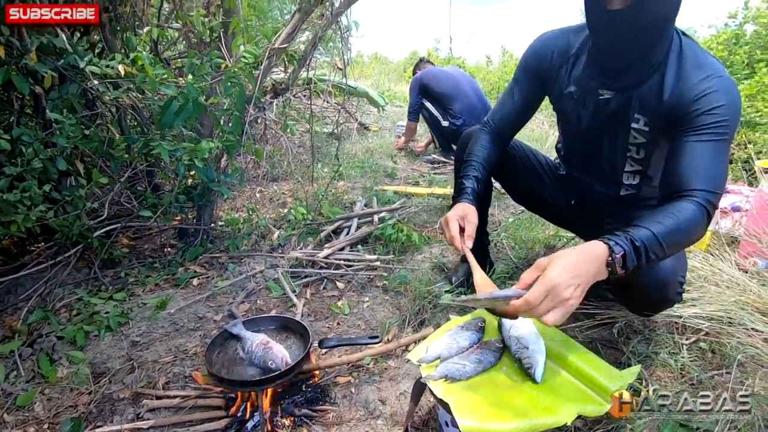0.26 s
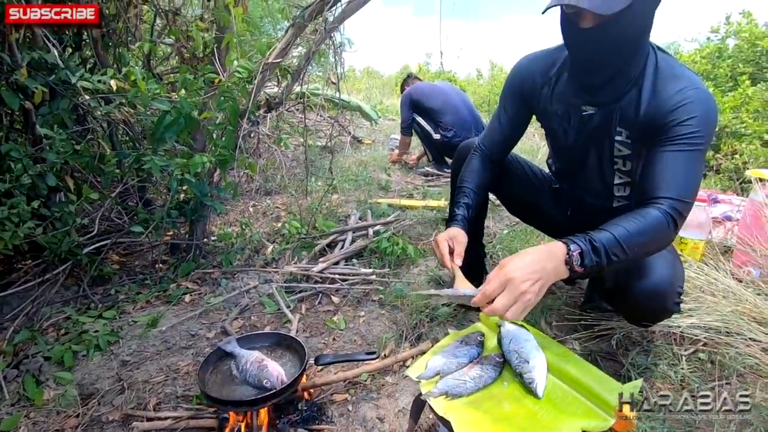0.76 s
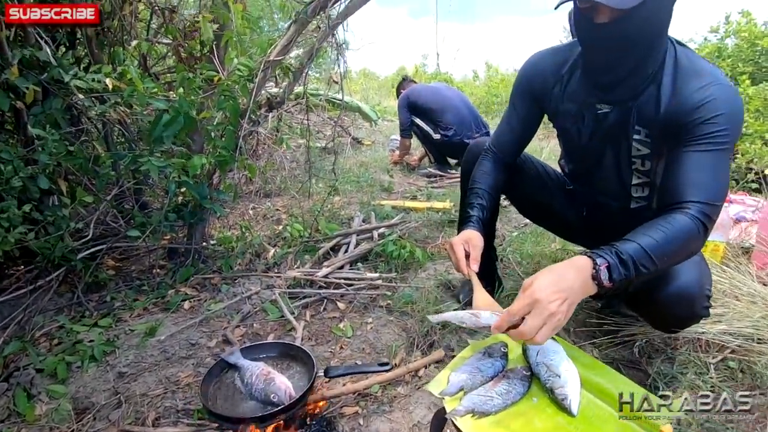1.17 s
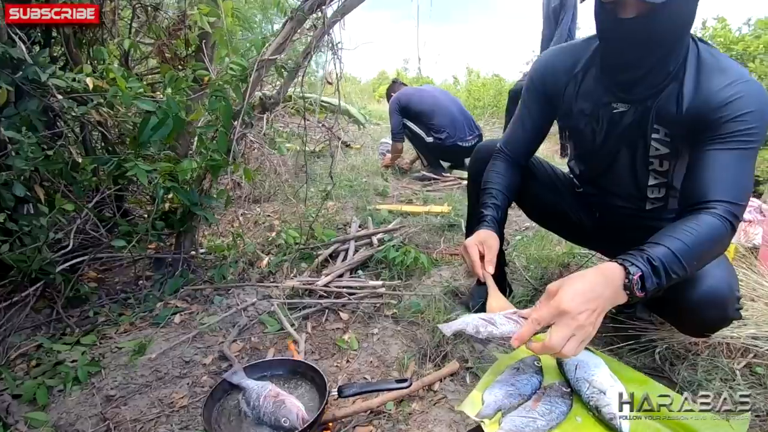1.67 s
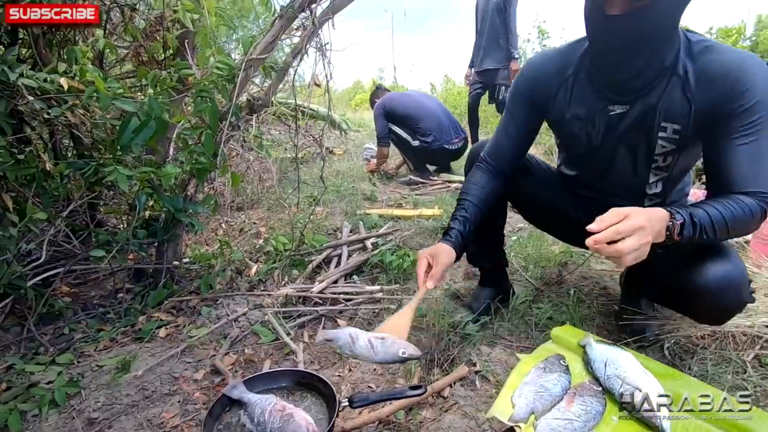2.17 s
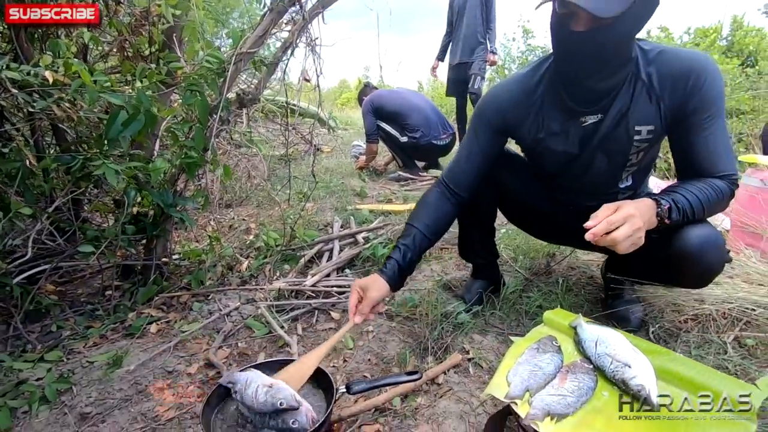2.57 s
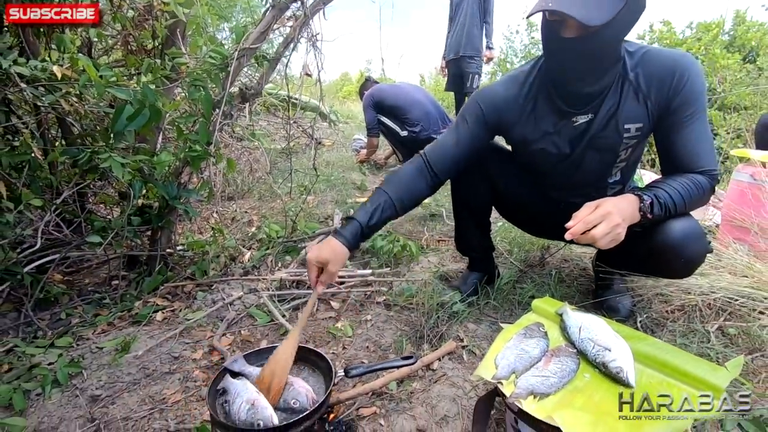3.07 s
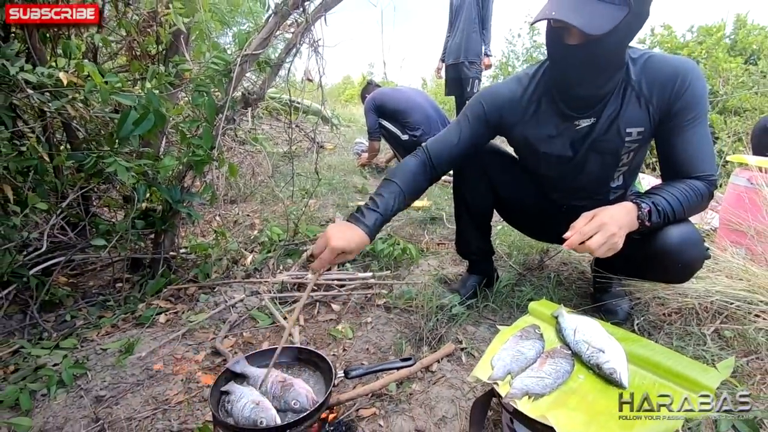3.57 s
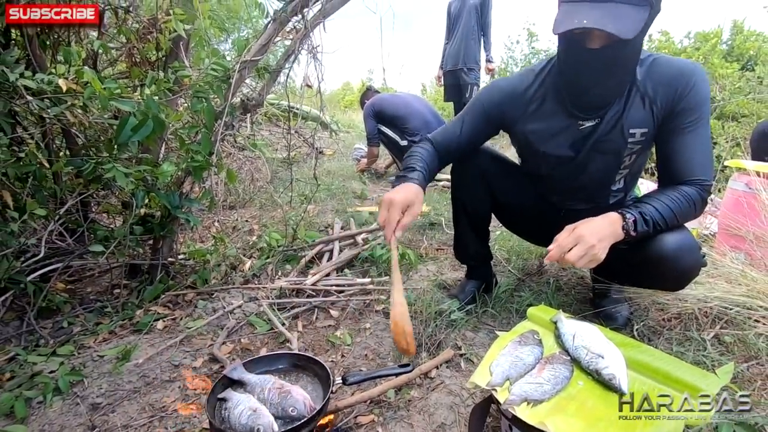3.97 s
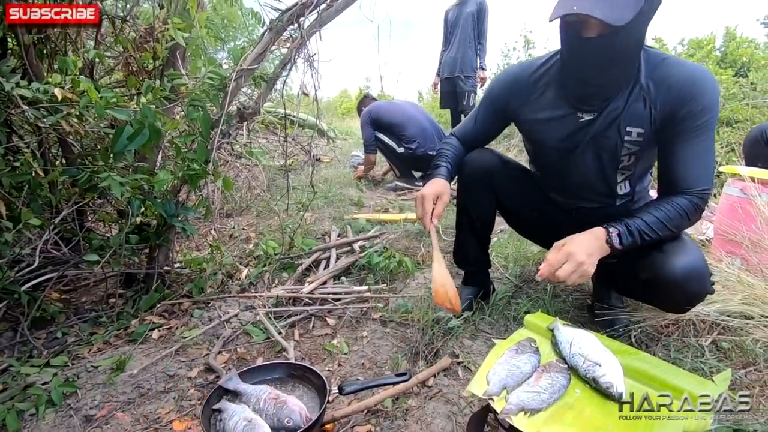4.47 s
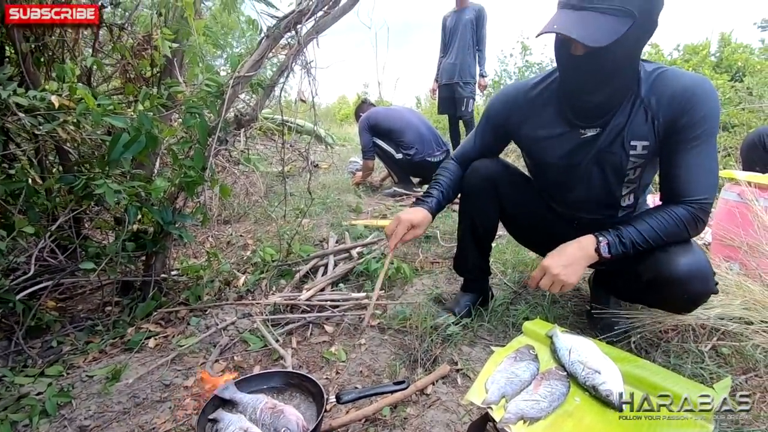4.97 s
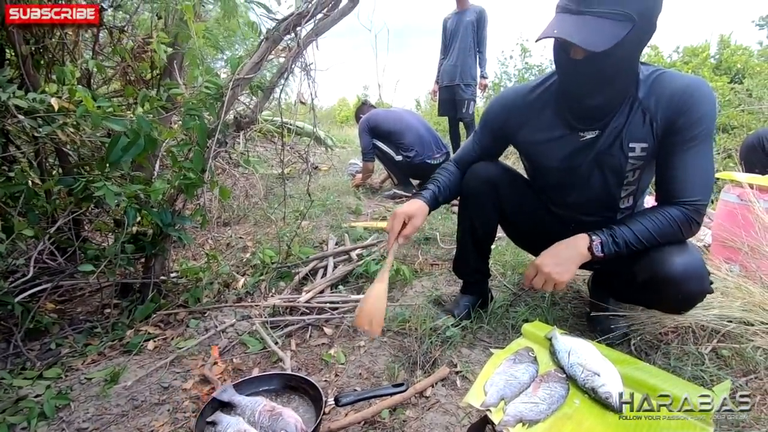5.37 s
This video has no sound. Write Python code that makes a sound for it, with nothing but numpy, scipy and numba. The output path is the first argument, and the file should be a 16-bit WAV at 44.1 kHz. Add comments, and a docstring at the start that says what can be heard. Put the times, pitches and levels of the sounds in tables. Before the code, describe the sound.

Close, outdoor stereo sound from a hand-held camera roughly a metre above a frying pan. A dense, bright sizzle of hot oil runs throughout, with tiny ticks, crackles and loud pops, clustered in the first 0.9 seconds. It dips briefly from about 1.47 to 1.59, returning abruptly with a sharp high spit, and a strong pop follows at 1.72. From about 2.5 to 3.5, as another fish enters the pan, the crackle sinks in pitch; pops crowd thickly around 4.0 to 4.6 and a very loud one snaps at 5.49. Further off, slightly right, dull wood chops fall near 1.25, 2.04, 2.77, 3.55 (clearest and woodiest) and 4.26, with light touches before some. A faint wavering engine drone and soft fire roar sit beneath, the roar fullest around 2.5. Low wind flutters early, calms mid-way, then buffets more strongly from 4.5 to the end.

```python
"""Fish frying over a wood fire

Outdoors, a pan of hot oil about a metre below a hand-held camera with two microphone ports.
Steam bubbles ring by the thousand; the ground echoes them, and the comb slides as the camera moves.
Wind flutters on the ports as coloured noise; an engine drones in narrow noise bands under a soft roar.
Further off somebody chops wood: each blow sets decaying modes ringing, with a crack and splinters."""
import sys
import numpy as np
from scipy import signal
from scipy.fft import rfft, irfft
from scipy.io import wavfile
from scipy.ndimage import uniform_filter1d, map_coordinates
from numba import njit

SR = 44100
rng = np.random.default_rng(int(sys.argv[2]) if len(sys.argv) > 2 else 0)


def put_to_file(sound):
    """Save the sound as 16-bit audio at rate SR, in the file named by the first command-line argument."""
    columns = np.atleast_2d(sound).T  # one column per channel
    safe = np.clip(columns, -1, 1)
    whole_steps = np.round(safe * 32767)
    wavfile.write(sys.argv[1], SR, whole_steps.astype(np.int16))


N = 247401

# How the fry boils; only the changes count, not the overall heights.
# Each row: time in seconds, large bubbles in dB, middling bubbles in dB, fine spray in dB.
BOIL_COURSE = [(0, -38.5, -22.5, -36), (.5, -37, -20.5, -36.5), (.98, -38, -25.5, -39),
               (1.26, -40, -21.5, -36.5), (1.44, -39.5, -23.5, -38), (1.6, -36.5, -21.5, -33.5),
               (1.69, -35, -19, -38), (1.82, -37, -20.5, -32.5), (1.96, -34.5, -22.5, -37.5),
               (2.5, -36, -20.5, -35.5), (2.8, -36.5, -22, -33.5), (2.95, -33.5, -20.5, -36),
               (3.1, -35, -22, -36), (3.36, -36, -20.5, -37), (3.75, -36, -23, -37.5),
               (3.95, -35.5, -20, -37), (4.5, -35, -22, -38.5), (5.0, -32, -21, -37),
               (5.61, -35, -20.5, -37.5)]


def undb(db):
    """Decibels to gain."""
    return 10 ** (np.asarray(db) / 20)


def level(x, db):
    """Scale to an rms level in dB."""
    return x * undb(db) / np.sqrt(np.mean(x ** 2))


def curves(table):
    """Columns of a curve table, joined by straight lines, one value a sample."""
    s, *columns = np.transpose(table)
    return [np.interp(np.arange(N) / SR, s, c) for c in columns]


def colour(x, points):
    """Filter by (Hz, dB) points, joined on a logarithmic frequency scale."""
    hz, db = np.transpose(points)
    f = np.arange(N // 2 + 1) * SR / N + 1  # one Hz up, to keep the logarithm finite
    gain = undb(np.interp(np.log(f), np.log(hz), db, left=-120))
    return irfft(rfft(x) * gain, N)


def band(lo_hz, hi_hz):
    """Noise between two edges, rms 1."""
    sos = signal.butter(3, [lo_hz, hi_hz], "bandpass", fs=SR, output="sos")
    return level(signal.sosfilt(sos, rng.standard_normal(N)), 0)


def walk(rate_hz):
    """Random steps drawn at a given rate and smoothed twice; standard deviation 1."""
    k = int(SR / rate_hz)
    steps = np.repeat(rng.standard_normal(N // k + 1), k)
    w = uniform_filter1d(uniform_filter1d(steps, k), k)[:N]
    return w / w.std()


def sides(pan_db):
    """Left and right gains from left minus right in dB."""
    return undb(np.array([pan_db, -pan_db]) / 2)


@njit
def bubbles(n, start, turn, ring_rad, size, tilt, glide):
    """Each bubble swells, rings with rising pitch and dies away; row 1 is the part unequal at the ports."""
    out = np.zeros((2, n))
    for k in range(len(start)):
        tau = ring_rad[k] / turn[k]  # decay time in samples
        z = size[k] * (np.e / 2 / tau) ** 2 + 0j  # brings the envelope's peak to size
        p = np.exp(1j * turn[k] - 1 / tau)
        bend = np.exp(1j * glide * turn[k] / tau)
        for i in range(min(int(9 * tau), n - start[k])):
            v = i * i * z.imag
            out[0, start[k] + i] += v
            out[1, start[k] + i] += tilt[k] * v
            z, p = z * p, p * bend
    return out


def burst(s, hz, ring_rad, size, tilt, glide=0.0056):
    """Bubbles at times s; the decay time spans ring_rad radians, in which pitch rises by the share glide."""
    start = (s * SR).astype(np.int64)
    return bubbles(N, start, 2 * np.pi * hz / SR, 1. * ring_rad, 1. * size, tilt, glide)


def singles(s, db, hz, ring_rad):
    """Loud bubbles one by one; each starts to swell two decay times before its peak."""
    ring_rad = np.clip(ring_rad, 1, 16) + 0 * s
    start = s - 2 * ring_rad / (2 * np.pi * hz)
    return burst(start, hz + 0 * s, ring_rad, undb(db), np.zeros(len(s)))[0]


def lull(start_s=1.466, fall_s=0.029, end_s=1.587, return_s=0.0041):
    """0 to 1 while the sizzle dips briefly and returns at once."""
    corners = [start_s, start_s + fall_s, end_s, end_s + return_s]
    return np.interp(np.arange(N) / SR, corners, [0, 1, 1, 0])


def boil(wander_db=1.0, flicker_db=0.74, lull_db=-4, lull_fine_db=-3.5):
    """Strength of large, middling and fine bubbles in dB: the slow course, a wander and the lull."""
    large, middling, fine = curves(BOIL_COURSE)
    middling = middling + wander_db * walk(7.) + lull_db * lull()
    fine = fine + flicker_db * walk(7.07) + lull_fine_db * lull()
    return large, middling, fine


def sizzle(count=130000, spread_db=1.5, top_db=2.5, ring_rad=7.0, spatter_db=0.97, together_db=0.52,
           lull_deepest_hz=5770, lull_deeper_db=-5):
    """A dense rain of bubbles, the smaller the more numerous; the boil comes in short spatters."""
    large_db, middling_db, fine_db = boil()
    when, pitch, luck, length, place = rng.random((count, 5)).T
    hz = 500 + 15500 * pitch
    at = (when * (N - 1)).astype(int)
    # shares of the three sizes, cross-faded by pitch
    large = np.clip(np.log(2400 / hz) / np.log(1.3), 0, 1)
    fine = np.clip(np.log(hz / 5800) / np.log(1.3), 0, 1)
    together = together_db * walk(9.)

    def swell(db):
        return (db - db.mean() + together + spatter_db * walk(45.))[at]

    boil_db = large * swell(large_db) + fine * swell(fine_db) + (1 - large - fine) * swell(middling_db)
    # bubbles near one pitch fall quietest in the lull
    nearness = np.exp(-(np.log(hz / lull_deepest_hz) / 0.23) ** 2)
    boil_db = boil_db + lull_deeper_db * lull()[at] * nearness
    size_db = np.minimum(-spread_db * np.log(luck + 1e-9), top_db) + boil_db
    # short high bubbles start stronger, so that the rain as a whole is white
    size = np.sqrt(hz) * undb(size_db)
    return burst(at / SR, hz, ring_rad * (.5 + 1.16 * length ** 2), size, 2 * place - 1)


def bright(x, hz=5140, width_hz=220):
    """A narrow resonance lifts one band of the sizzle, strongest at first, briefly again, then almost gone."""
    # Each row: time in seconds, share of the band added.
    bright_course = [(0, 1), (1.4, 1), (1.75, .2), (2.25, 0.63), (2.75, 0.083), (5.61, .01)]
    return x + curves(bright_course)[0] * signal.lfilter(*signal.iirpeak(hz, hz / width_hz, fs=SR), x)


def crackle(count=450, scatter=.15, spread_db=0.7, ring_rad=7.4):
    """Middling pops at random moments, of uneven size and ring, crowd round a favoured pitch."""
    # The pitch sinks as the second fish goes in.
    # Each row: time in seconds, middle pitch in Hz, base level in dB before each pop's own luck.
    crackle_course = [(0, 3600, -20), (1.0, 3800, -18), (2.5, 3780, -20), (3.5, 2520, -21),
                      (4.4, 2640, -17.5), (5.61, 2780, -19.5)]
    when, luck, length = rng.random((count, 3)).T
    hz, db = (c[(when * (N - 1)).astype(int)] for c in curves(crackle_course))
    s = .01 + when * (N / SR - .02)
    hz = hz * np.exp(scatter * rng.standard_normal(count))
    return singles(s, db - spread_db * np.log(luck + 0.12), hz, ring_rad * (.5 + length))


def ticks(count=900, hz=3200.0, scatter=0.33, tick_db=-23, spread_db=2.5, ring_rad=1.77):
    """Tiny droplets snap and die within a few cycles, so each tick covers a wide band."""
    when, luck = rng.random((count, 2)).T
    boil_db = boil()[1][(when * (N - 1)).astype(int)] - curves(BOIL_COURSE)[1].mean()
    db = tick_db + boil_db - spread_db * np.log(luck + 0.03)
    s = .01 + when * (N / SR - .02)
    return singles(s, db, hz * np.exp(scatter * rng.standard_normal(count)), ring_rad)


def pops():
    """Loud single bubbles, each with its own pitch and ring."""
    # Each row: peak time in seconds, peak of the direct sound in dB, pitch in Hz,
    # ring in radians per decay time.
    pop_rows = [(0.04, -10, 3890.0, 3.5), (0.0954, -10, 3640, 5.1), (0.1332, -10, 3600.0, 2.2),
                (0.1587, -5, 3600.0, 4.1), (0.2032, -3, 3070, 7.8), (0.254, -7, 3200.0, 3),
                (0.2738, -11, 3760, 3.1), (0.3752, -3, 3460.0, 3.8), (0.4057, -5, 4550.0, 2.6),
                (0.567, -6, 3540, 7.5), (0.591, -7, 4100.0, 10.5), (0.5944, -11.5, 3460.0, 4.1),
                (0.6753, -10.5, 4100, 10), (0.7008, -4, 3430, 2.2), (0.7185, -11, 3740.0, 2.6),
                (0.7642, -12, 4050.0, 10.5), (0.808, -8, 3540, 11), (0.8415, -7, 4000, 8),
                (0.8936, -5.5, 4940, 5.9), (1.0163, -15, 3600, 3), (1.1523, -10, 3940, 2.3),
                (1.455, -5, 4200, 3.3), (1.6834, -14, 3600.0, 8.0), (1.6917, -11, 3460.0, 6.0),
                (1.7162, 0.5, 4050.0, 1.8), (1.7425, -7, 5340, 4.5), (1.899, -8, 4800, 6.6),
                (2.126, -5, 3950, 4.5), (2.264, -9, 3700, 5.9), (2.277, -15, 3330.0, 2.3),
                (2.2903, -8, 3330.0, 3.8), (2.331, -9, 3740.0, 6.3), (2.3575, -9, 3620, 3.8),
                (2.3685, -8, 3890.0, 10.5), (2.4528, -5, 4380.0, 2.0), (2.4624, -6, 3330.0, 3.2),
                (2.4656, -15, 3890.0, 10.5), (2.4808, -10, 3460.0, 4.5), (2.554, -13.5, 4000, 13.0),
                (2.63, -10, 3460.0, 2.0), (2.6374, -8, 3330.0, 2.5), (2.6527, -10, 4050.0, 10.5),
                (2.6631, -13.5, 4050.0, 7.1), (2.7417, -9.5, 3300, 10.5), (2.762, -4.5, 3350, 2.6),
                (2.859, -4, 3460.0, 2.2), (2.966, -2, 3740.0, 2.4), (2.9748, -5.5, 2530.0, 3.0),
                (3.043, -9, 3740.0, 2.0), (3.0722, -12, 4210.0, 11), (3.09, -3.5, 4020, 5.5),
                (3.135, -9, 2630.0, 6.6), (3.19, -6, 2960.0, 3.0), (3.2818, -10, 3860, 5.2),
                (3.3121, -7, 3080.0, 3.0), (3.3175, -12.5, 2730.0, 2.7), (3.4148, -14, 3200.0, 3),
                (3.4708, -6.5, 3800, 13.0), (3.5603, -6, 2980, 3.8), (3.627, -11.5, 2670, 10.5),
                (3.8041, -5.5, 2730.0, 3.9), (3.843, -7, 2730.0, 2.6), (3.915, -8, 2960.0, 4.5),
                (3.9194, -9, 2840.0, 7), (3.9258, -9, 2840.0, 4.9), (3.9345, -6, 2250.0, 2.0),
                (3.9847, -6, 3200.0, 2.0), (3.9942, -6, 2580, 8.0), (4.013, -6, 4050.0, 2.0),
                (4.0191, -10, 2700, 8.0), (4.0393, -4, 3890.0, 2.4), (4.1247, -10.5, 2500, 13.0),
                (4.134, -7.5, 2630.0, 6.5), (4.1542, -10, 3600.0, 7.3), (4.22, -8, 2100.0, 2.8),
                (4.224, -18, 1620, 12), (4.252, -8.5, 2530.0, 4.9), (4.283, -11.5, 2840.0, 3.0),
                (4.2936, -5.5, 2420, 4.5), (4.3178, -8, 2630.0, 2.6), (4.3384, -11, 3460.0, 3.0),
                (4.342, -9.5, 3200.0, 1.8), (4.3605, -3.5, 2700, 7), (4.372, -9, 3100, 13.0),
                (4.385, -4, 2730.0, 2.8), (4.3915, -2.5, 2700, 5.7), (4.4114, -4, 2900, 6.0),
                (4.4309, -13, 2730.0, 8.3), (4.446, -6.5, 3080, 11), (4.4657, -8, 2840.0, 4.5),
                (4.4705, -7, 3200.0, 2.6), (4.474, -5, 3600.0, 2.8), (4.5363, -6.5, 2730.0, 5.7),
                (4.5403, -11, 2730.0, 6.4), (4.57, -5, 2490, 4.5), (4.5765, -3, 3200.0, 2.0),
                (4.582, -9, 3600.0, 3.0), (4.6205, -5, 2960.0, 4.3), (4.6265, -10, 3040, 9.1),
                (4.7771, -7.5, 2400, 7.5), (4.782, -9, 4050.0, 4), (4.823, -13, 3080.0, 4.9),
                (4.829, -9, 3460.0, 2.6), (4.854, -10.5, 3200.0, 2.3), (4.8613, -6, 5150, 6.5),
                (4.8625, -14, 6100, 7.5), (4.9173, -10, 2530.0, 3.2), (4.9226, -4.5, 2830, 8.5),
                (4.9576, -13, 2940, 6.0), (4.973, -11, 3100, 10), (4.98, -11, 3440, 10.5),
                (5.0271, -4, 3020, 6.9), (5.0294, -9, 1340, 4.5), (5.0361, -2, 2690.0, 3),
                (5.081, -13, 2530.0, 1.7), (5.173, -4, 3460.0, 7.2), (5.1798, -8, 2300.0, 5.5),
                (5.2322, -7, 3200, 10.5), (5.2708, -5, 3300.0, 6.5), (5.282, -4, 2250.0, 2.5),
                (5.2879, -6, 3460.0, 1.8), (5.297, -11, 3740.0, 2.0), (5.322, -10, 3080.0, 4.5),
                (5.3455, -9, 2820, 7.1), (5.3516, -9.5, 3330.0, 1.8), (5.356, -12, 3180, 9.1),
                (5.3624, -6, 2250.0, 2.9), (5.4066, -8.5, 2450, 5.7), (5.4832, -8, 4100, 3.2),
                (5.4909, 1, 3460.0, 6), (5.578, -4, 2630.0, 1.8)]
    return singles(*np.transpose(pop_rows))


def spits(hz=9900, ring_rad=5.2):
    """Sharp spits of oil ring like bubbles, but very high."""
    # Each row: peak time in seconds, peak of the direct sound in dB.
    spit_rows = [(0.1286, -17), (0.2912, -26), (1.594, -10.5), (1.733, -20), (4.9846, -20), (5.1492, -23),
                 (5.489, -20)]
    return singles(*np.transpose(spit_rows), hz, ring_rad)


def echoes(x, damp_hz=4320.0, far_hz=3600.0, far_width_hz=3700.0):
    """The direct sound, a bounce off the ground, which swallows treble, and a longer middle-band bounce."""
    # The echoes shorten overall as the camera sinks.
    # Each row: time in seconds, ground lag in ms, its share, further lag in ms, its share.
    echo_course = [(0, 0.86, .33, 1.43, 0.36), (.5, 0.87, .36, 1.46, 0.33), (.9, .9, .36, 1.45, 0.31),
                   (1.3, 0.89, .35, 1.46, 0.3), (1.7, 0.83, 0.33, 1.42, .3), (1.95, 0.8, .2, 1.35, 0.39),
                   (2.2, 0.72, 0.17, 1.31, 0.48), (2.5, .71, 0.16, 1.28, .4), (2.8, 0.63, 0.18, 1.2, 0.25),
                   (3.1, 0.68, 0.34, 1.225, .22), (3.5, .7, 0.32, 1.175, 0.18), (4.3, .68, 0.3, 1.19, 0.16),
                   (5.1, 0.63, 0.15, 1.22, 0.11), (5.61, 0.63, .21, 1.13, .1)]
    lag, share, lag_far, share_far = curves(echo_course)
    dull = signal.sosfilt(signal.butter(1, damp_hz, fs=SR, output="sos"), x)
    middle = signal.filtfilt(*signal.iirpeak(far_hz, far_hz / far_width_hz, fs=SR), x)

    def late(v, ms):
        return map_coordinates(v, [np.arange(N) - ms * SR / 1000], order=3, mode="nearest")

    return x + share * late(dull, lag) + share_far * late(middle, lag_far)


def frying(rain_db=-21.0, scatter_db=-9.5):
    """The pan with its echoes; every small bubble reaches the two ports a little unequally."""
    # Tone of the sizzle. Each row: frequency in Hz, filter gain in dB.
    fry_colour = [(350, -69), (600, -28), (1520, -8.5), (2190, -10.5), (2600, -4), (4060, -0.5), (4770, -7),
                  (5840, -8), (6700, -13), (7250, -18), (9490, -16.5), (11300, -29), (13800, -33.5),
                  (15000, -46)]
    # Tone of the part unequal at the ports. Each row: frequency in Hz, filter gain in dB.
    scatter_colour = [(350, -8), (600, -17.5), (1090, -11), (1400, -13), (1630, -8.5), (2820, -0.5),
                      (5180, -2), (9360, -4.5), (15000, -32.5)]
    # The pan drifts across. Each row: time in seconds, left minus right in dB.
    pan_course = [(0, 1), (1.5, 0), (4.4, 0.3), (5.61, 0)]
    rain, uneven = sizzle()
    rain = bright(level(colour(rain, fry_colour), rain_db))
    near = echoes(rain + spits() + crackle() + ticks() + pops())
    scatter = level(colour(uneven, scatter_colour), rain_db + scatter_db)
    return near * sides(curves(pan_course)[0]) + scatter * np.array([[1], [-1]])


def wind(shared=0.59, flutter_db=4.0):
    """Fluttering turbulence on each port, mostly unrelated left and right; gusts swell and fade smoothly."""
    # Tone of the rumble. Each row: frequency in Hz, filter gain in dB.
    wind_colour = [(14, -11), (24, -0.5), (36, -5), (52, 0), (70, -6), (112, -8), (135, -21.5), (160, -37),
                   (500, -92)]
    # Light air on both ports. Each row: time in seconds, level in dB.
    breeze = [(0, -30), (1.3, -41.5), (2.2, -36.5), (3.1, -35.5), (3.7, -53), (4.35, -41), (4.6, -36),
              (5.61, -37)]
    # Gusts, added to the light air. Each row: peak time in seconds, length in seconds,
    # left level in dB, right level in dB.
    gusts = [(0.093, 0.12, -46, -35), (0.289, 0.13, -47, -26), (0.722, 0.12, -48, -25.5),
             (1.035, 0.35, -35, -25.5), (1.217, 0.24, -30, -27), (1.527, 0.21, -41, -38),
             (2.973, 0.095, -25, -30), (4.548, 0.16, -17.5, -30), (4.628, 0.1, -20, -30),
             (4.72, 0.33, -25.5, -47), (4.914, 0.29, -32.5, -33), (5.182, 0.37, -20.5, -18),
             (5.343, 0.1, -22, -37), (5.403, 0.21, -17.5, -22), (5.61, 0.17, -19, -22.5)]

    def puff():
        return level(colour(rng.standard_normal(N), wind_colour), 0) * undb(flutter_db * walk(18.))

    both, t = puff(), np.arange(N) / SR
    gain = undb(curves(breeze)[0]) * np.ones((2, 1))
    for s, length, *db in gusts:
        hump = np.cos(np.pi * np.clip((t - s) / length, -.5, .5)) ** 2
        gain = gain + undb(db)[:, None] * hump
    return np.array([g * level(shared * both + puff(), 0) for g in gain])


def distance(split_hz=480.0, field_db=-39.5, side_db=-11.5, flicker_db=1.2):
    """A wavering engine drone, made of narrow noise bands, over the soft roar of the fire and the land."""
    # The drone. Each row: centre in Hz, width in Hz, level in dB.
    engine = [(118.6, 8, -44), (161.7, 5.8, -61), (181.8, 2.84, -48), (229.6, 4.8, -53)]
    # Tone of fire and distant land. Each row: frequency in Hz, filter gain in dB.
    field = [(53, -0.5), (90, -9.5), (118, -21), (135, -5), (167, -2), (210, -9), (347, -19.5),
             (900, -25.5), (1170, -31), (1980, -120)]
    # The roar above the split swells to its strongest near the middle, sinks and rises a little again.
    # Each row: time in seconds, gain in dB.
    flames = [(0, -7), (1.5, -3), (2.5, 6), (4.0, 0), (5.61, 3.5)]
    drone = sum(undb(db) * band(hz - width / 2, hz + width / 2) for hz, width, db in engine)
    mid, side = (level(colour(rng.standard_normal(N), field), field_db) for _ in range(2))
    roar = mid + undb(side_db) * side * np.array([[1], [-1]])
    low = signal.sosfiltfilt(signal.butter(2, split_hz, fs=SR, output="sos"), roar)
    flicker = undb(flicker_db * walk(16.))
    return drone + flicker * (low + undb(curves(flames)[0]) * (roar - low))


def ring(modes, t, lasting=1):
    """Decaying modes of a struck body; lasting stretches every t60."""
    out = 0
    for hz, db, t60 in modes:
        out = out + undb(db) * np.sin(2 * np.pi * hz * t) * np.exp(-np.log(1000) * t / (lasting * t60))
    return out


def chopping(rise_s=0.0018, splinter_db=3.0, splinter_s=0.0059, thud_s=0.0029):
    """Each blow rings the log, thuds into the ground, and cracks and splinters by its own amount."""
    # Blows on wood, some after a light touch. Each row: start in seconds, gain in dB, thud in dB,
    # crack in dB, left minus right in dB, ring of the log as a share of its t60.
    blows = [(1.245, -29, 9.5, -8, -3, 0.64), (1.951, -35, 6, -1, -5, 1.1),
             (2.035, -26.5, 5, -2.5, -3, 0.95), (2.772, -32, 6, 5, -5, 0.86), (3.466, -35.5, 4, 7, -5, .9),
             (3.545, -18.5, -9, -1.5, -6, 0.93), (4.264, -28, 4.5, -4, -2.5, 1.26)]
    # Modes of the log. Each row: frequency in Hz, relative level in dB, t60 in seconds before that share.
    log_modes = [(320, -26, 0.077), (396, -2, 0.03), (510, 0.5, 0.065), (730, -10, 0.059)]
    # Modes of the ground's thud. Each row: frequency in Hz, relative level in dB, t60 in seconds.
    thud_modes = [(139, 5.5, 0.037), (190, 1.5, 0.053), (252, -11.5, 0.076)]
    # Modes of the crack. Each row: frequency in Hz, relative level in dB, t60 in seconds.
    crack_modes = [(1130, -7, 0.028), (1590, -1, 0.056), (2030, -8, 0.035)]
    out, t = np.zeros((2, N)), np.arange(SR // 4) / SR
    late = np.maximum(t - thud_s, 0)  # the block passes the blow to the ground a moment later
    thud = ring(thud_modes, late) * (1 - np.exp(-late / rise_s))
    fibres = band(750.0, 2700.0)
    for s, db, thud_db, crack_db, pan_db, lasting in blows:
        i = int(s * SR)
        body = ring(log_modes, t, lasting) * (1 - np.exp(-t / rise_s)) + undb(thud_db) * thud
        splinters = undb(splinter_db) * fibres[i:i + len(t)] * np.exp(-t / splinter_s)
        crack = ring(crack_modes, t) + splinters
        out[:, i:i + len(t)] += sides(pan_db)[:, None] * undb(db) * (body + undb(crack_db) * crack)
    return out


def scene():
    """Pan, wind, distance and chopping."""
    return frying() + wind() + distance() + chopping()


def record(dry, ceiling=.95, top_hz=15100):
    """The camera rounds the loudest peaks and cuts the top."""
    rounded = dry / (1 + (dry / ceiling) ** 4) ** .25
    return signal.sosfilt(signal.ellip(10, .2, 70, top_hz, fs=SR, output="sos"), rounded)


dry = scene()
out = record(dry)
put_to_file(out)
```